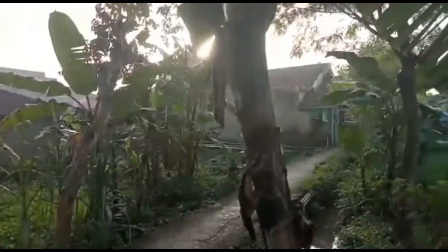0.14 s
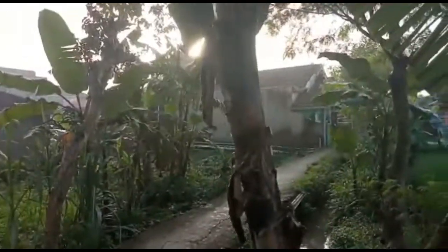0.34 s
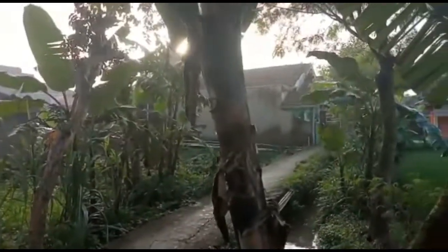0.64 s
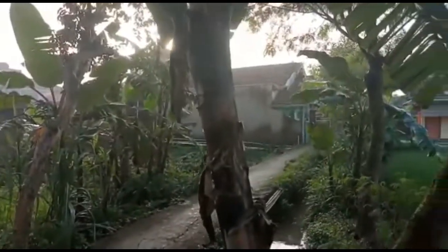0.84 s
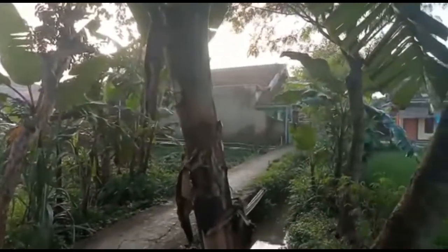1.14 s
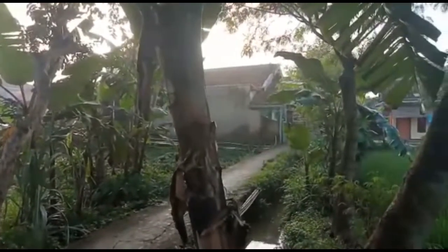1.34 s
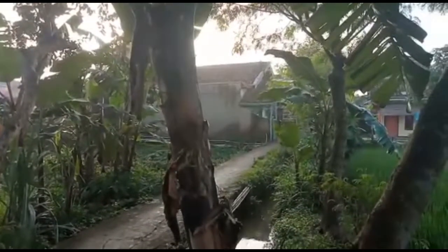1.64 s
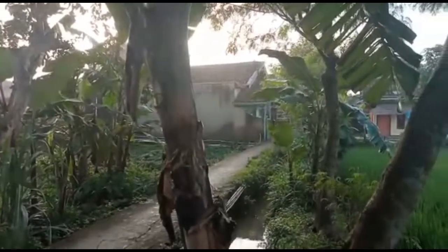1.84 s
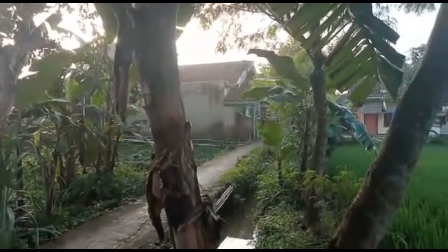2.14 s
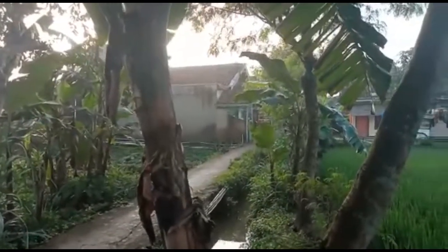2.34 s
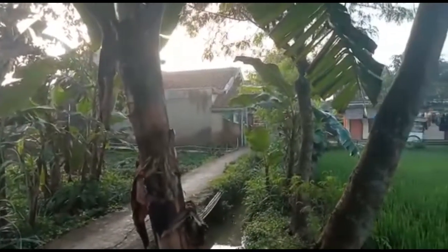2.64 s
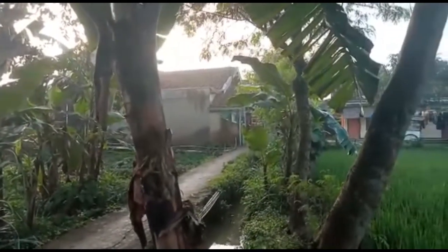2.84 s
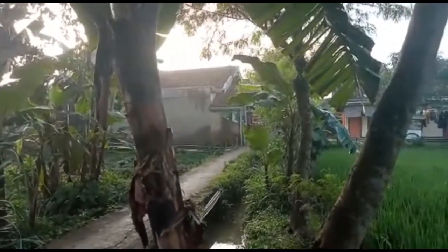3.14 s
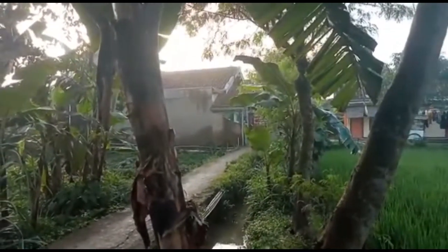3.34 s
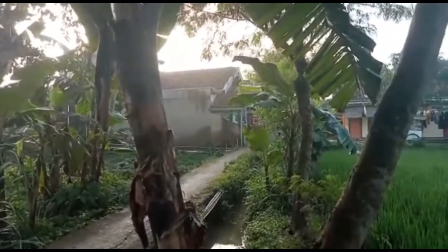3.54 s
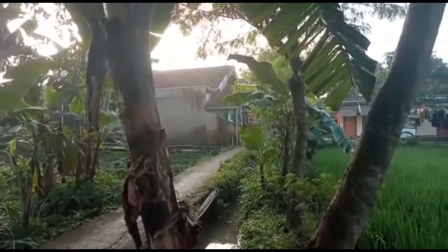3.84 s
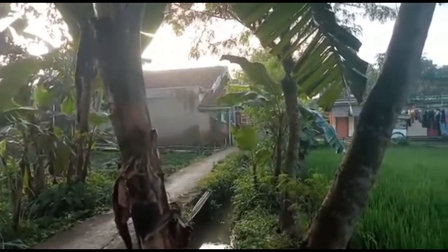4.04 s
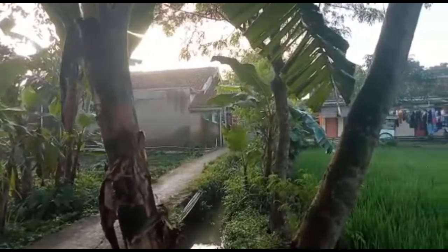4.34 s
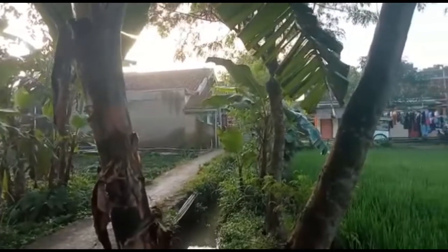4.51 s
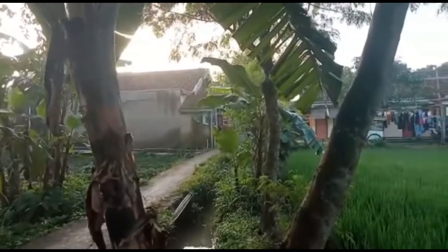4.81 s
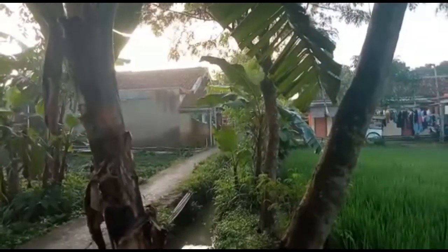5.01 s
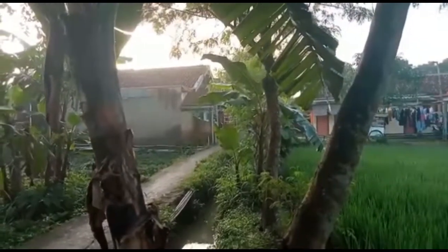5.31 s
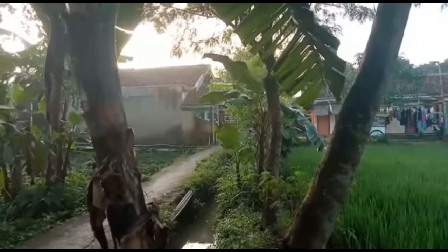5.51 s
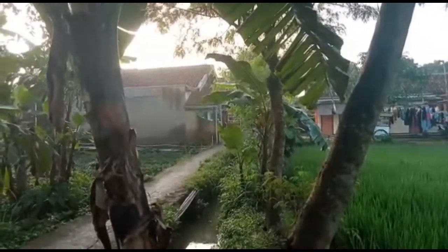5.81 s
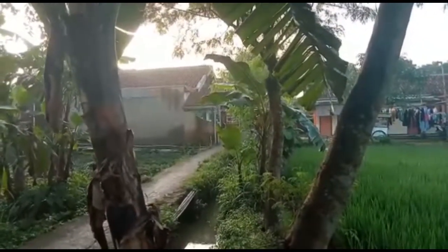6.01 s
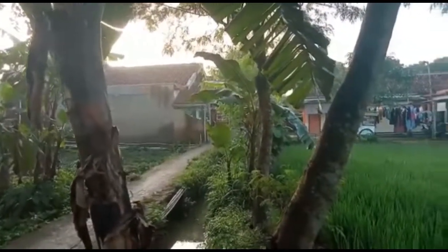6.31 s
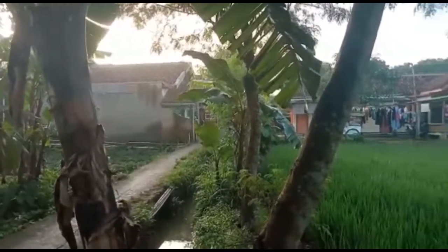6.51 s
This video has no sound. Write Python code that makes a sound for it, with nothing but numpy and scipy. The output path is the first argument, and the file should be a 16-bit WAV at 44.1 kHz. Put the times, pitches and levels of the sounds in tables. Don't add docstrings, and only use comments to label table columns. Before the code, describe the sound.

Continuous rushing water in a narrow channel beside a field, heard close up in mono by a small microphone. Its hiss flutters in quick little surges, dotted with bright bubble plops and lower gulps. A faint, hoarse far-off cockcrow ends within the first second, alongside a barely audible leaf rustle that dies away. The flow gradually softens.

```python
import sys
import numpy as np
from scipy import signal
from scipy.fft import rfft, irfft, next_fast_len
from scipy.io import wavfile
from scipy.ndimage import uniform_filter1d, map_coordinates

SR = 44100
rng = np.random.default_rng(int(sys.argv[2]) if len(sys.argv) > 2 else 0)


def rack_gain(trim_db):
    fader = np.asarray(trim_db, float)
    return 10 ** (fader / 20)


def bounce(signal):
    frames = np.transpose(np.atleast_2d(signal))
    limited = np.clip(frames, -1, 1)
    pcm = np.round(limited * 32767).astype(np.int16)
    wavfile.write(sys.argv[1], SR, pcm)


N = 293706


def unit(x):
    return x / np.sqrt(np.mean(x ** 2) + 1e-20)


def wobble(rate_hz):
    knots = rng.standard_normal(int(N * rate_hz / SR) + 4)
    return map_coordinates(knots, [np.arange(N) * rate_hz / SR])


def swells(rows, half_width_s):
    s, swing_db = np.transpose(rows)
    coarse_s = np.arange(0, N / SR + .002, .002)
    bumps = np.exp(-((coarse_s - s[:, None]) / half_width_s) ** 2)
    return np.interp(np.arange(N) / SR, coarse_s, swing_db @ bumps)


def coloured(x, points):
    m = next_fast_len(N + 8192)
    spectrum, hz = rfft(x, m), np.fft.rfftfreq(m, 1 / SR)
    own = np.sqrt(np.abs(uniform_filter1d(np.abs(spectrum) ** 2, size=3000))) + 1e-9
    point_hz, level_db = np.transpose(points)
    colour = rack_gain(np.interp(np.log(hz + 1), np.log(point_hz + 1), level_db))
    return unit(irfft(spectrum / own * colour, m)[:N])


def patchy(broad_db, narrow_db):
    x = rng.standard_normal(N + 2048)
    for depth_db, size, bins, frames in ((broad_db, 256, 4, 6), (narrow_db, 1024, 2, 2)):
        z = signal.stft(x, nperseg=size)[2]
        field = uniform_filter1d(rng.standard_normal(z.shape), bins, axis=0)
        field = uniform_filter1d(field, frames, axis=1)
        x = signal.istft(z * rack_gain(depth_db * unit(field)), nperseg=size)[1]
    return unit(x[:N])


def placed(start_s, sounds):
    size = sounds.shape[1]
    at = np.round(start_s * SR).astype(int)[:, None] + np.arange(size)
    return np.bincount(at.ravel(), sounds.ravel(), N + size)[:N]


def rings(start_s, gain, hz, t60_s, rise, size):
    t = np.arange(size) / SR
    age = t / t60_s[:, None]
    tone = np.sin(2 * np.pi * hz[:, None] * t * (1 + rise * age))
    shape = rack_gain(-60 * age) * (1 - np.exp(-age / 0.1))
    return placed(start_s, gain[:, None] * tone * shape)


def bubbles(count, mid_hz, octaves, cycles, spread_db, size):
    u = rng.random((count, 2))
    hz = np.clip(mid_hz * 2 ** (octaves * rng.standard_normal(count)), 400, 15000)
    larger = np.minimum(-np.log(1 - u[:, 1]), 3.2)
    density = np.exp((np.log2(hz / mid_hz) / octaves) ** 2 / 8)
    return unit(rings(u[:, 0] * N / SR, rack_gain(spread_db * larger) / density, hz, cycles / hz, 0.08, size))


# time_s, level_db
FLOW_LEVEL = [(0.0, -28), (1.61, -30), (1.87, -29.5), (2.59, -30.5), (3.26, -30), (5.45, -31),
              (6.01, -30.5), (6.66, -31.5)]


def flow_loudness():
    s, level_db = np.transpose(FLOW_LEVEL)
    return np.interp(np.arange(N) / SR, s, level_db)


# centre_s, swing_db
CURRENT_SURGES = [(.033, 2.5), (.145, -1.5), (.343, 1.5), (.392, -2.5), (.705, -1.5), (.813, 0),
                  (3.95, -0.5), (1.227, 0.5), (1.362, -2), (1.559, 2), (1.724, -2), (2.123, -3), (2.31, 4),
                  (2.438, 0), (2.608, -1.5), (2.787, 1), (2.948, -1.5), (3.462, -3), (3.524, 1.5),
                  (3.659, 2), (4.371, 3.5), (4.549, -2.5), (4.656, -1.5), (5.004, -0.5), (5.435, 3),
                  (5.718, -3.5), (5.771, 3), (6.215, 0.5), (6.322, 1.5), (6.505, -3)]


def current_surges():
    return swells(CURRENT_SURGES, half_width_s=0.018)


# centre_s, swing_db
SPIT_BURSTS = [(.02, 1), (.09, 3), (.93, 0.5), (1.43, 1), (1.8, -2), (2.22, 4), (2.5, 3.5), (3.15, 2),
               (3.89, 3), (4.51, 3), (5.96, 1.5)]


def spitting():
    return swells(SPIT_BURSTS, half_width_s=0.018) + 0.45 * wobble(16) + 0.29 * wobble(25)


# pitch_hz, level_db
BODY_COLOUR = [(240, -24), (400, -4.5), (484, -5.5), (560, -1), (1600, -1), (2080, -16), (3520, -120)]


def body(slow_db, quick_db):
    ringing = bubbles(count=2500, mid_hz=905.3, octaves=0.605, cycles=35.4, spread_db=2.5, size=1400)
    water = patchy(0.55, 1.4) + rack_gain(-10.5) * ringing
    mean_db = slow_db.mean()
    level_db = mean_db - 8.5 + 0.68 * (slow_db - mean_db) + 0.44 * quick_db + 1.02 * wobble(9)
    return rack_gain(level_db) * coloured(water, BODY_COLOUR)


# pitch_hz, level_db
RUSH_COLOUR = [(760, -30), (1300, -10.5), (1600, -9), (1800, -2.5), (2070, 0), (2600, 0), (3250, 0),
               (3650, -4), (4050, -10), (4450, -14), (4940, -26.5), (5200, -32), (6760, -57), (11400, -120)]


def rush(slow_db, quick_db, flutter_db):
    ringing = bubbles(count=4500, mid_hz=2601, octaves=0.4976, cycles=57.0, spread_db=1.0, size=600)
    water = patchy(0.76, 2.34) + rack_gain(-13) * ringing
    return rack_gain(slow_db - 0.19 + 0.86 * quick_db + flutter_db) * coloured(water, RUSH_COLOUR)


# pitch_hz, level_db
FIZZ_COLOUR = [(3180, -51), (5400, -15.5), (6310, -14), (7040, -2), (7410, 0.5), (9200, -20),
               (12000, -23.5), (20200, -120)]


def fizz(slow_db, quick_db, flutter_db, spit_db):
    ringing = bubbles(count=7000, mid_hz=7070, octaves=0.29, cycles=66, spread_db=5.5, size=300)
    water = patchy(0.63, 2.4) + rack_gain(-14.0) * ringing
    level_db = slow_db - 14 + 0.38 * quick_db + 0.89 * flutter_db + spit_db + 0.2 * wobble(18)
    return rack_gain(level_db) * coloured(water, FIZZ_COLOUR)


# pitch_hz, level_db
SPRAY_COLOUR = [(3500, -38), (5000, -12), (6200, -0.5), (8800, -4.5), (9700, -3), (10800, -2.5),
                (11500, -7.5), (13000, -5), (14800, -2), (15400, -0.5)]


def spray(slow_db, quick_db, flutter_db, spit_db):
    ringing = bubbles(count=7000, mid_hz=11950, octaves=0.285, cycles=34, spread_db=2.4, size=150)
    water = patchy(.3, 2.7) + rack_gain(-8.5) * ringing
    level_db = slow_db - 20.5 + 0.25 * quick_db + .6 * flutter_db + 0.76 * spit_db + .3 * wobble(12)
    return rack_gain(level_db) * coloured(water, SPRAY_COLOUR)


# pitch_hz, level_db
ROAR_COLOUR = [(15, -70), (25, -45), (34, -43), (57, -9.5), (134, 2.5), (170, -4.5), (205, 0.5), (259, -9),
               (340, 0.5), (429, -12), (480, -7), (620, -19), (1060, -120)]
# centre_s, swing_db
ROAR_HEAVES = [(.08, 4), (.78, 0), (1.02, 8), (1.17, 1), (1.92, 4), (2.06, -0.5), (2.53, 1.5), (3.45, 4),
               (3.65, 7), (4.45, 2), (4.95, 4), (5.12, 4.5), (5.51, 3), (5.95, 2), (6.12, 5), (6.45, 4)]


def roar(slow_db):
    level_db = slow_db.mean() - 16.5 + swells(ROAR_HEAVES, half_width_s=0.03) + 1.4 * wobble(9)
    return rack_gain(level_db) * coloured(patchy(1.16, 2.8), ROAR_COLOUR)


def stream():
    slow_db, quick_db, spit_db = flow_loudness(), current_surges(), spitting()
    flutter_db = 0.21 * wobble(16) + 0.28 * wobble(40)
    low = body(slow_db, quick_db) + roar(slow_db)
    high = fizz(slow_db, quick_db, flutter_db, spit_db) + spray(slow_db, quick_db, flutter_db, spit_db)
    return low + rush(slow_db, quick_db, flutter_db) + high


# start_s, length_s, pitch_hz, level_db, noise_share
CROW_PARTIALS = [(.004, .036, 790, -29, .2), (.03, .062, 810, -37, .4), (.082, .038, 695, -35, .4),
                 (.09, .045, 792, -32, .3), (.128, .1, 795, -36, .4), (.143, .036, 692, -33, .4),
                 (0, .12, 1600, -43, .7), (.472, .042, 1450, -39, .4), (.505, .055, 1415, -40, .4),
                 (.558, .175, 1458, -31, .12), (.722, .048, 1438, -38, .4), (.595, .065, 712, -43, .5),
                 (.655, .065, 697, -42, .5), (.712, .075, 678, -36.5, .4)]


def crow():
    t = np.arange(SR) / SR
    waver, swell, rough_a, rough_b = (wobble(rate_hz)[:SR] for rate_hz in (38, 48.7, 131.6, 128.5))
    throb_hz, throb_db, peak_s = 19.5, 3, .597
    throb = rack_gain(throb_db * np.cos(2 * np.pi * throb_hz * (t - peak_s)) + 0.66 * swell)
    start_s, length_s, hz, level_db, noise_share = np.transpose(CROW_PARTIALS)[:, :, None]
    age_s = t - start_s
    edge_s, sag_per_s = .016, .04
    edges = np.clip(np.minimum(age_s, length_s - age_s) / edge_s, 0, 1)
    shape = np.sin(np.pi / 2 * edges) ** 2
    phase = 2 * np.pi * np.cumsum(hz * (1 - sag_per_s * age_s + 0.003 * waver), axis=1) / SR
    hoarse = rough_a * np.sin(phase) + rough_b * np.cos(phase)
    voice = throb * np.sin(phase) + noise_share * hoarse
    call = np.sum(np.sqrt(2) * rack_gain(level_db) * shape * voice, axis=0)
    return np.pad(call, (0, N - SR))


# pitch_hz, level_db
LEAF_COLOUR = [(3500, -30), (5200, -5), (9000, -5), (12500, -5), (15400, -8), (16500, -30)]


def leaves():
    fall_s = 1.0
    breeze_db = -50.5 - 10 * (np.arange(N) / SR / fall_s) ** 2
    grains = bubbles(count=6000, mid_hz=9500, octaves=.5, cycles=6.6, spread_db=6.0, size=60)
    rustle = patchy(1.5, 1.1) + rack_gain(-2) * grains
    return rack_gain(breeze_db + 1.6 * wobble(22)) * coloured(rustle, LEAF_COLOUR)


# start_s, peak_db
DROPLETS = [(0.0438, -35), (0.381, -41), (1.1872, -44), (1.2645, -51), (1.4287, -51), (1.5449, -43),
            (1.7978, -37), (1.8602, -36), (2.0896, -38), (3.8836, -42), (5.9534, -41)]


def droplets():
    s, peak_db = np.transpose(DROPLETS)
    t60_s = 0.0063
    decay_db = -60 * np.arange(300) / SR / t60_s
    bursts = rng.standard_normal((len(s), 300)) * rack_gain(peak_db[:, None] + 5 + decay_db)
    bright = signal.butter(3, [8500, 13500], "band", fs=SR, output="sos")
    return signal.sosfilt(bright, placed(s, bursts))


# start_s, peak_db, pitch_hz
GULPS = [(.155, -22, 1110), (.156, -19, 1270), (.19, -24, 494), (0.23, -21, 590), (0.426, -25, 543),
         (0.645, -22, 920), (0.872, -26, 1240), (0.921, -26, 1100), (1.016, -22, 1046), (1.326, -29, 660),
         (1.532, -26, 1320), (2.002, -28, 915), (2.243, -26, 1330), (2.866, -22.5, 925),
         (2.931, -23.5, 740), (3.003, -23, 1350), (3.516, -23, 1330), (3.557, -20.5, 707),
         (3.125, -23.5, 1080), (3.896, -21.5, 820), (4.24, -25.5, 590), (4.281, -24, 523),
         (4.738, -24, 1090), (4.768, -24, 1070), (5.092, -24, 1310), (5.705, -26, 860), (5.89, -26, 890),
         (6.154, -26, 634), (6.219, -23.5, 490), (6.305, -26, 633)]


def gulps():
    s, peak_db, hz = np.transpose(GULPS)
    t60_s = np.full(len(s), .032)
    return rings(s, rack_gain(peak_db + 2.5), hz, t60_s, rise=0.11, size=3000)


# start_s, peak_db, pitch_hz
SPLASHES = [(0.8057, -5, 3270), (0.841, -10, 2340), (0.969, -11.5, 3300), (1.066, -12, 3000),
            (1.4301, -11, 2880), (1.474, -14, 2100), (1.7914, -11, 2700), (1.862, -8.5, 3380),
            (2.181, -13, 2500), (2.3101, -4.5, 2070), (2.312, -11, 3100), (2.322, -14, 2300),
            (2.5304, -8, 3270), (3.0724, -11, 2500), (3.7963, -9, 2570), (3.908, -14, 2060),
            (4.0587, -13, 3370), (4.2995, -12, 3120), (4.4827, -12, 2000), (4.8379, -11, 2280),
            (5.576, -12.5, 3140), (5.6274, -15, 2090), (5.7319, -17, 2070), (5.9397, -12, 2460),
            (6.024, -11, 2930), (6.307, -22, 1550), (6.3081, -9.5, 3250), (6.5195, -14, 2220),
            (6.6353, -14, 2830)]


def splashes():
    s, peak_db, hz = np.transpose(SPLASHES)
    cycles = 26.6
    return rings(s, rack_gain(peak_db - 0.1), hz, cycles / hz, rise=0.037, size=1500)


def scene():
    return (stream() + crow() + leaves() + droplets() + gulps() + splashes())[None]


def roll_off(x):
    return signal.sosfilt(signal.butter(12, 16670, fs=SR, output="sos"), x)


def record(dry):
    top_hz = 15478
    kept = irfft(rfft(dry) * (np.fft.rfftfreq(N, 1 / SR) < top_hz), N)
    return roll_off(kept)


dry = scene()
out = record(dry)
bounce(out)
```